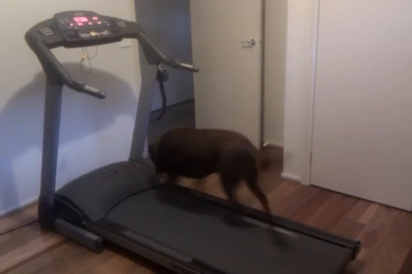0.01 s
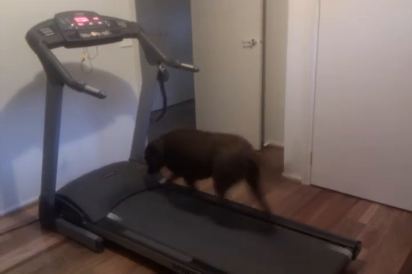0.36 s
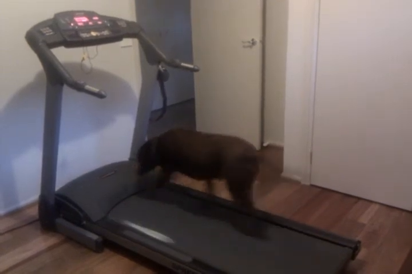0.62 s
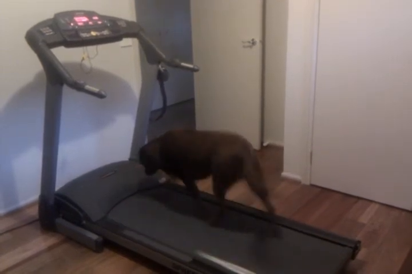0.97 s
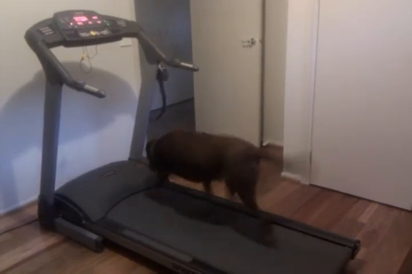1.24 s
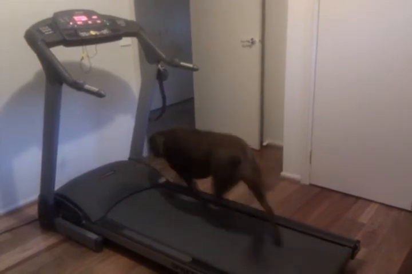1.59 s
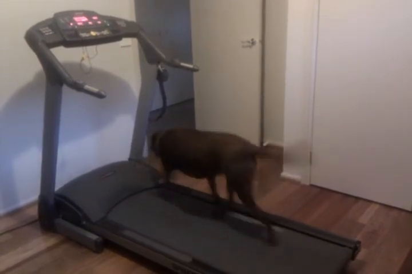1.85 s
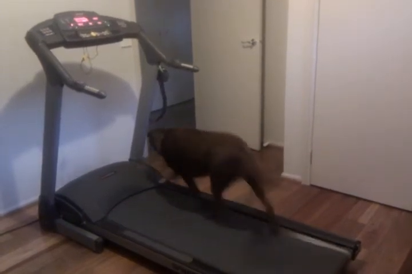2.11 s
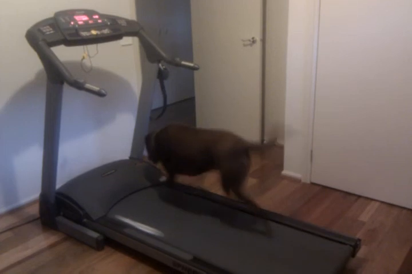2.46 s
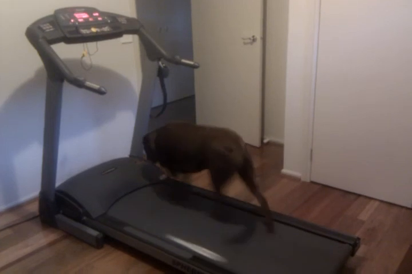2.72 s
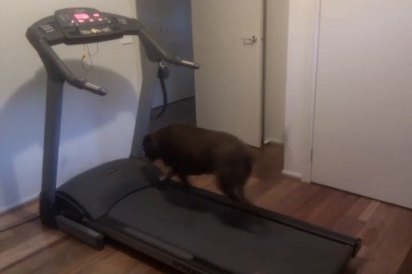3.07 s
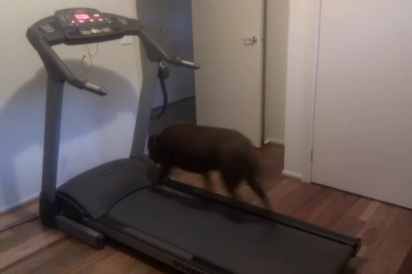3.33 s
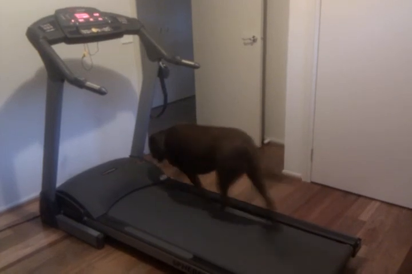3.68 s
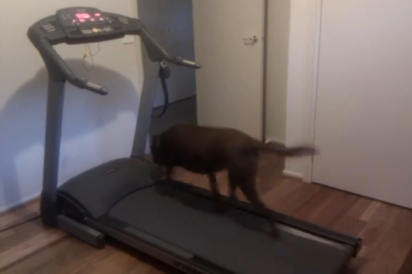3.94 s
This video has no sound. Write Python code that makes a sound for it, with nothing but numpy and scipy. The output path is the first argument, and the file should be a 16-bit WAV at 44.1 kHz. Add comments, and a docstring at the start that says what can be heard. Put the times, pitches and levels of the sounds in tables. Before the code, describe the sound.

A treadmill runs in a small room, its belt hissing over a faint, wavering motor whine. A dog's paws thump and scuff in a steady rhythm, with sharp claw taps and short squeaks, heard from across the room.

```python
"""In a small room with a wooden floor, a dog walks on a running treadmill.
The motor hums under the hiss of the sliding belt. Each paw slaps the belt, thumps the deck (the
board under it) and scuffs the belt over it. Claws tap and scratch, and under some steps the belt
sticks and slips with a squeak. The room adds a short echo."""
import sys
import numpy as np
from scipy import signal
from scipy.fft import rfft, irfft
from scipy.io import wavfile

SR = 44100
rng = np.random.default_rng(int(sys.argv[2]) if len(sys.argv) > 2 else 0)


def store_wav(level_fs):
    """Save 16-bit WAV to argv[1]."""
    pcm = np.round(np.clip(np.atleast_2d(level_fs), -1, 1) * 32767)
    wavfile.write(sys.argv[1], SR, pcm.T.astype(np.int16))


N = 176400
T = np.arange(N) / SR
FREQS = np.arange(N // 2 + 1) * SR / N

# The tone colour of a claw on the belt. Each row: frequency in Hz, relative level in dB.
CLAW_COLOUR = [(150, -41.5), (400, -22.5), (1200, -9.5), (1900, 3), (3000, -1), (5000, -3.5), (6000, 4.5),
               (6700, 10.5), (7300, -8.5)]


def amp(db):
    """Turn decibels into a number to multiply by."""
    return 10 ** (np.asarray(db) / 20)


def unit(x):
    """Scale a signal to an average (rms) size of 1."""
    return x / np.sqrt(np.mean(x ** 2))


def colour(x, points, tilt_db=0):
    """Shape a sound by (Hz, dB) points, tilt its treble by tilt_db per octave and scale to size 1."""
    octave = np.log2(np.maximum(FREQS, 1))
    hz, db = np.array(points).T
    curve_db = np.interp(octave, np.log2(hz), db)
    treble_db = tilt_db * np.maximum(octave, np.log2(np.median(hz)) - 1)
    return unit(irfft(rfft(x) * amp(curve_db + treble_db), N))


def wander(rate):
    """A random curve of size 1 that heads for a new value rate times a second."""
    points = rng.standard_normal(8192)
    return unit(np.interp(T * rate, np.arange(len(points)), points))


def friction(grain):
    """Rubbing noise made of many tiny slips; more grain makes them more uneven."""
    return rng.standard_normal(N) * np.exp(grain * wander(1500))


def envelope(start, attack, hold, t60):
    """Rise over attack; from hold after the start, fade by 60 dB every t60. All are in seconds."""
    age = T - start
    return np.clip(age / attack, 0, 1) * np.exp(-np.log(1000) * np.clip((age - hold) / t60, 0, 2))


def ring(x, hz, t60):
    """Let x shake something that rings at one pitch and dies away."""
    pole = np.exp((2j * np.pi * hz - np.log(1000) / t60) / SR)
    return signal.lfilter([np.sqrt(1 - abs(pole) ** 2)], [1, -pole], x).imag


def rubs(rows, points, grain, attack, t60):
    """Bursts of rubbing, each with its own length, level and brightness."""
    slips = friction(grain)
    out = np.zeros(N)
    for start, hold, db, tilt_db in rows:
        noise = colour(np.roll(slips, rng.integers(N)), points, tilt_db)
        out += amp(db) * envelope(start, attack, hold, t60) * noise
    return out


def low_cut(x, hz, order):
    """Remove the bass below hz; a higher order cuts more steeply."""
    ratio = (FREQS / hz) ** order
    return irfft(rfft(x) * ratio / np.hypot(1, ratio), N)


def room(x, t60=0.38):
    """Many reflections from the nearby walls blur into one short echo."""
    t = T[:SR]
    tail = rng.standard_normal(SR) * np.exp(-np.log(1000) * t / t60) * (t > 0.005)
    return signal.fftconvolve(x, tail / np.linalg.norm(tail))[:N]


def rumble():
    """A faint, deep rumble lies under everything."""
    # The rumble's tone colour. Each row: frequency in Hz, relative level in dB.
    rumble_colour = [(20, 4), (40, -10.5), (60, -4.5), (72, -13), (95, -31.5), (200, -60)]
    return amp(-59 + wander(6.7)) * colour(rng.standard_normal(N), rumble_colour)


def motor():
    """The motor's whine swells and sinks with the load, over fainter tones of motor and rollers."""
    # The loudness of the whine. Each row: time in seconds, level in dB.
    whine_levels = [(0, -47.5), (.21, -40), (.39, -50), (.58, -37.5), (.69, -56), (.91, -36), (1, -47),
                    (1.15, -43), (1.3, -44), (1.5, -40), (1.59, -48), (1.77, -40.5), (1.9, -49.5),
                    (2.09, -33), (2.17, -48.5), (2.32, -44), (2.48, -49), (2.6, -39), (2.72, -53),
                    (2.8, -40.5), (3.1, -40), (3.21, -53.5), (3.6, -37.5), (3.75, -47), (3.83, -39),
                    (4, -42)]
    # The fainter tones. Each row: pitch in Hz, level in dB, waver as a fraction of the pitch.
    faint_tones = [(209.6, -56.5, 0.025), (301.5, -55.5, 0.013), (365.6, -59, .02), (461.4, -57.5, 0.0088),
                   (929, -56.5, 0.012), (1206, -50.5, .009), (1875, -54.5, .03)]

    def tone(hz, waver, flutter_db=2.2):
        phase = 2 * np.pi * np.cumsum(hz * (1 + waver * wander(150))) / SR
        return unit(np.sin(phase) * amp(flutter_db * wander(45)))

    whine_db = np.interp(T, *np.array(whine_levels).T)
    whine = amp(whine_db) * tone(hz=603, waver=0.017)
    return whine + sum(amp(db + 2 * wander(12)) * tone(hz, waver) for hz, db, waver in faint_tones)


def belt_hiss():
    """The belt slides steadily over the deck and hisses."""
    # The hiss's tone colour. Each row: frequency in Hz, relative level in dB.
    hiss_colour = [(110, -13.5), (130, 1), (250, -3), (450, -6.5), (700, -0.5), (1100, -2.5), (1600, -2),
                   (1850, 7), (2100, -2), (2700, -2), (5000, -4.5), (6000, 6), (6700, 5.5), (7050, 1),
                   (7350, -11.5)]
    sway_db = np.clip(2.5 * wander(14), -1, 1)
    return amp(-31 + sway_db) * colour(friction(grain=0.17), hiss_colour)


def belt_rasp():
    """Once, near the start, the belt rubs with a longer rasp."""
    # The rasp's tone colour. Each row: frequency in Hz, relative level in dB.
    rasp_colour = [(700, -25), (1200, -12.5), (1500, -2), (2000, -4.5), (2200, -5), (2700, -9), (4000, -18),
                   (7000, -31.5)]
    loudness = amp(-27.5) * envelope(start=0.181, attack=0.0018, hold=0.092, t60=1)
    return loudness * colour(friction(grain=0.33), rasp_colour)


def belt_squeaks(sag_per_s=0.25, flutter_db=2.8):
    """The loaded belt sticks and slips: a shaky, sinking tone whose three harmonics each flutter."""
    # Each row: start in seconds, length in seconds, pitch in Hz, level in dB, second and third
    # harmonics (2 and 3 times the pitch) in dB compared with the first, roughness of the pitch.
    squeaks = [(0.183, 0.017, 1952, -18, -9.5, -10, 1.12), (.188, 0.053, 1747, -30.5, -15.5, -19, 0.75),
               (0.279, 0.014, 1300, -27, -12, -7, 0.46), (0.29, 0.071, 1848, -28, -4, -6.5, 0.58),
               (.841, 0.0067, 1890, -21, -28, -25, 0.63), (2.004, 0.017, 1890, -20, -8, -6.5, .25),
               (2.033, 0.011, 1884, -25.5, 5, -3, .35), (2.527, 0.05, 1890, -21.5, -1, -5, .4),
               (2.583, 0.049, 1870, -27.5, -1, -17, 0.77), (2.777, 0.048, 1885, -26, 0, -13, .38),
               (2.84, 0.025, 1887, -28, -12, -14, 0.75), (3.018, 0.0091, 1883, -18, -23, -15, 1.015),
               (3.035, 0.024, 1878, -21, -1, -2, .28), (3.084, .07, 1790, -29, -5, -13, .7),
               (3.534, .018, 1880, -21.5, -8, -11, 0.65), (3.547, .011, 1850, -23.5, 7, -6, .3),
               (3.574, 0.0096, 1885, -24, 1, -10, .25), (3.605, .02, 1872, -26, -4, -9, 0.62),
               (3.68, .007, 2317, -28.5, -20, -21, 0.55), (3.882, .012, 2244, -28, -18, -20, 1)]
    out = np.zeros(N)
    for start, length, hz, db, second_db, third_db, roughness in squeaks:
        sag = sag_per_s * np.clip(T - start, 0, length)
        jitter = 0.06 * roughness * wander(900)
        phase = 2 * np.pi * np.cumsum(hz * (1 - sag + jitter)) / SR
        tone = sum(amp(part_db + flutter_db * wander(400)) * np.sin(harmonic * phase)
                   for harmonic, part_db in [(1, 0), (2, second_db), (3, third_db)])
        out += amp(db) * envelope(start, attack=0.0018, hold=length, t60=0.045) * unit(tone)
    return out


def belt_scuffs():
    """A paw presses the moving belt down, so it rubs harder on the deck."""
    # Each row: start in seconds, hold in seconds, level in dB, treble tilt in dB per octave.
    scuffs = [(.0, 0.0056, -25, 0), (.075, 0.063, -21, 4.5), (.181, 0.016, -21.5, 0.5),
              (.286, .06, -20.5, 4), (.598, 0.03, -23.5, 4), (.840, 0.011, -24, 0.5),
              (.890, 0.026, -23, -1), (1.168, 0.016, -24.5, -0.5), (1.428, .01, -25, -0.5),
              (1.476, 0.013, -22, 2), (1.716, 0.078, -27, 0.5), (1.992, 0.056, -24.5, 3),
              (2.042, 0.024, -17.5, 0), (2.25, 0.044, -26.5, 2.5), (2.318, 0.025, -22, 1.5),
              (2.524, 0.058, -16.5, 7.5), (2.584, 0.019, -15, 0), (2.775, 0.022, -21, 2.5),
              (2.838, 0.0061, -18.5, -0.5), (3.022, 0.068, -21.5, 4), (3.086, 0.026, -21.5, 2),
              (3.260, 0.025, -26.5, 0.5), (3.336, 0.013, -22, 1), (3.462, 0.0071, -26.5, -2),
              (3.532, 0.015, -20, 4), (3.608, 0.007, -17.5, 0.5), (3.682, 0.017, -29, -7),
              (3.786, 0.011, -20.5, 5), (3.802, 0.021, -21.5, -0.5), (3.884, 0.0073, -24.5, 1)]
    # A scuff's tone colour. Each row: frequency in Hz, relative level in dB.
    scuff_colour = [(110, -35), (200, -15), (600, -10.5), (1200, -5), (2100, 2.5), (2900, -1), (3800, -0.5),
                    (5000, -3), (5800, 1.5), (6600, 5.5), (7050, 1), (7350, -10)]
    return rubs(scuffs, scuff_colour, grain=0.22, attack=0.0021, t60=0.67)


def claw_scratches():
    """Claws drag briefly across the belt."""
    # Each row: start in seconds, length in seconds, level in dB, treble tilt in dB per octave.
    scratches = [(.350, 0.012, -16.5, 0.5), (.626, 0.0043, -24, -2), (1.476, .032, -17, -2),
                 (1.763, 0.0088, -21.5, -4), (2.044, 0.0078, -15.5, 3), (2.319, .013, -14.5, 1.5),
                 (2.584, 0.0091, -19, -1), (3.085, .007, -16, -2), (3.155, 0.0045, -13, 5.5),
                 (3.801, 0.023, -18.5, -4)]
    return rubs(scratches, CLAW_COLOUR, grain=0.3, attack=0.0028, t60=0.0088)


def claw_taps(lead_s=0.004, lead_db=-4.5):
    """Neighbouring claws hit the belt one after the other: a light tick, then a sharp one."""
    # The sharp ticks. Each row: start in seconds, level in dB.
    taps = [(.118, -15), (0.359, -15.5), (0.6271, -6), (.898, -10), (1.7685, -10), (2.0468, -7),
            (2.323, -12.5), (2.328, -9), (2.6128, -5), (2.8436, -6), (3.089, -12), (3.1568, -2.5),
            (3.803, -8)]

    def tick(start):
        return envelope(start, attack=0.00039, hold=0.00079, t60=0.003)

    contact = sum(amp(db) * (tick(start) + amp(lead_db) * tick(start - lead_s)) for start, db in taps)
    return contact * colour(rng.standard_normal(N), CLAW_COLOUR, tilt_db=2.5)


def paws():
    """Each paw pad slaps the belt and sets the deck ringing; the last step also shakes the frame."""
    # The paw landings. Each row: start in seconds, push on the deck in dB, slap level in dB.
    landings = [(0.283, -34, -29), (0.554, -33.5, -28.5), (.837, -39.5, -30.5), (1.125, -35.5, -30),
                (1.419, -33.5, -30.5), (1.718, -40, -32.5), (1.987, -49, -32.5), (2.271, -24.5, -25.5),
                (2.523, -31.5, -27.5), (2.771, -36.5, -34), (3.018, -34.5, -24.5), (3.258, -46, -37),
                (3.53, -33.5, -30.5), (3.801, -36, -25)]
    # The deck's own notes. Each row: pitch in Hz, seconds to fade by 60 dB, relative level in dB.
    deck_notes = [(132.8, 0.38, 1), (178, 0.13, -7), (211.4, 0.066, 0), (256, 0.12, -5),
                  (325.8, 0.25, -3.5), (356, 0.18, -23.5), (517, 0.062, -14.5)]
    # The tone colours of pad and frame. Each row: frequency in Hz, relative level in dB.
    slap_colour = [(110, -23), (200, -5), (500, -5.5), (900, 0), (1500, -0.5), (2500, -4), (4500, -3.5),
                   (7300, -49)]
    boom_colour = [(110, -61), (200, -18), (320, -5.5), (470, 1), (540, -4.5), (650, -0.5), (1000, -28),
                   (3000, -38)]
    push, slap = np.zeros(N), np.zeros(N)
    for start, push_db, slap_db in landings:
        push += amp(push_db) * envelope(start, attack=0.0052, hold=0.032, t60=0.12)
        slap += amp(slap_db) * envelope(start, attack=0.0017, hold=0.016, t60=0.33)
    push *= rng.standard_normal(N)
    thump = sum(amp(db) * ring(push, hz, t60) for hz, t60, db in deck_notes) / 2
    boom = amp(-30.5) * envelope(start=3.808, attack=0.0052, hold=0.032, t60=0.6)
    boom *= colour(rng.standard_normal(N), boom_colour)
    slap *= colour(friction(grain=0.35), slap_colour)
    return thump + slap + boom


def scene():
    """Treadmill and dog heard from across the room, the same in both channels."""
    scuffs = belt_scuffs()
    claws = claw_scratches() + claw_taps()
    steps = scuffs + belt_rasp() + paws()
    squeaks = belt_squeaks()
    echo = room(amp(-7.5) * steps + amp(-2.5) * squeaks + amp(-19.5) * claws)
    background = rumble()
    treadmill = motor() + belt_hiss() + steps + claws + squeaks
    mono = background + low_cut(treadmill + echo, hz=136, order=20)
    return np.array([mono, mono])


def record(dry, ceiling=0.95, lopsided=0.052, top_hz=7450):
    """The recorder rounds the loudest peaks, a little lopsidedly, and cuts the highest treble."""
    rounded = ceiling * np.tanh((dry - lopsided * dry ** 2) / ceiling)
    treble_cut = signal.ellip(10, 0.3, 70, top_hz, fs=SR, output="sos")
    return signal.sosfilt(treble_cut, rounded)


dry = scene()
out = record(dry)
store_wav(out)
```